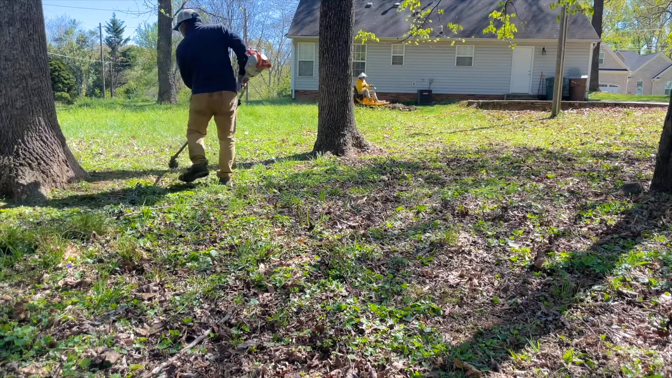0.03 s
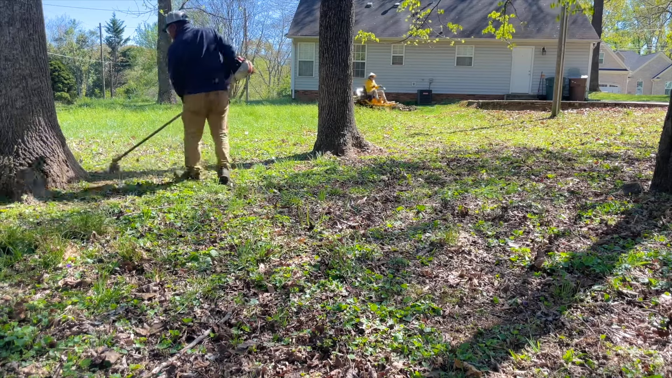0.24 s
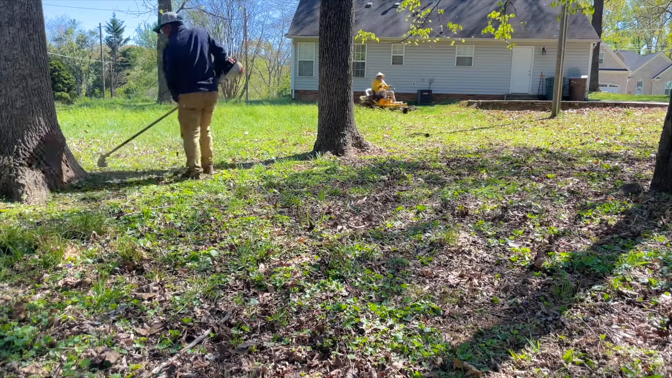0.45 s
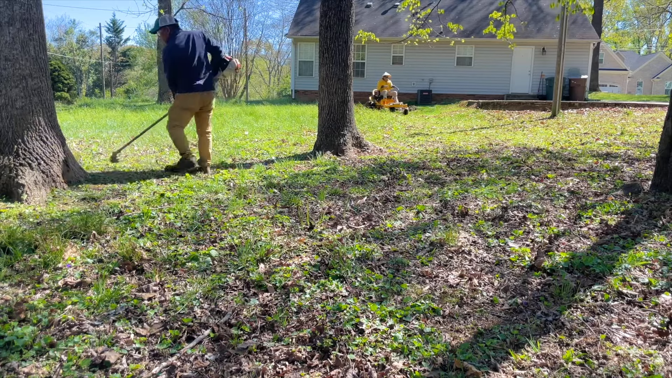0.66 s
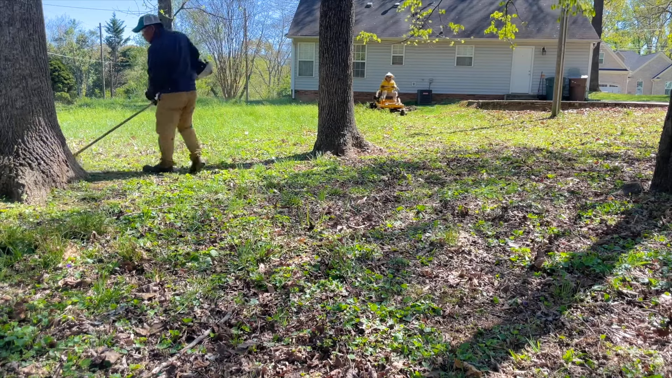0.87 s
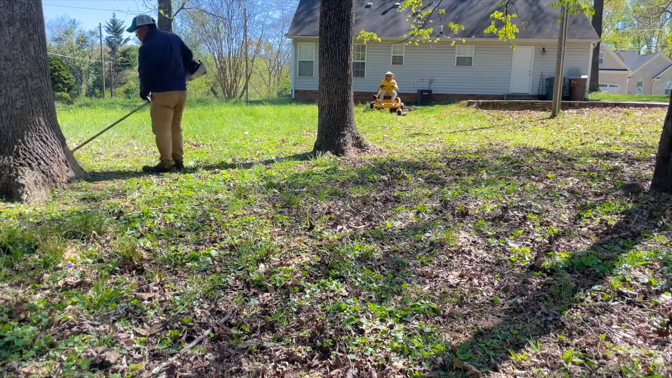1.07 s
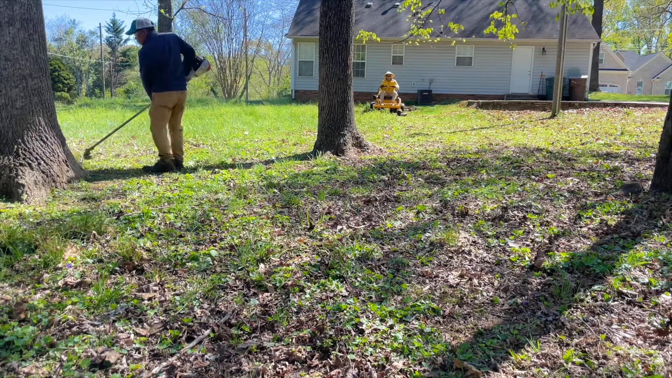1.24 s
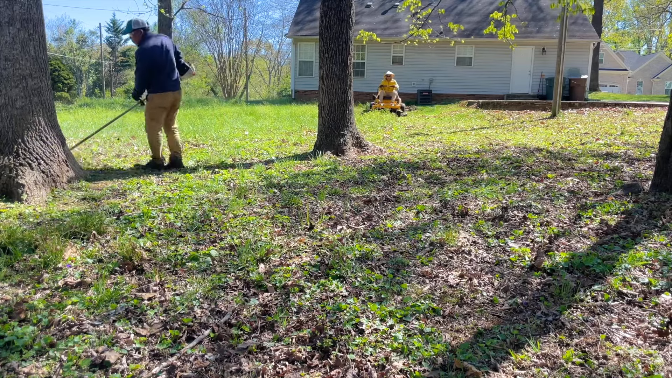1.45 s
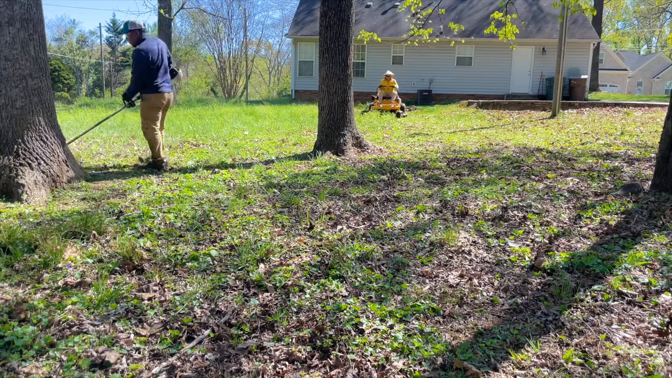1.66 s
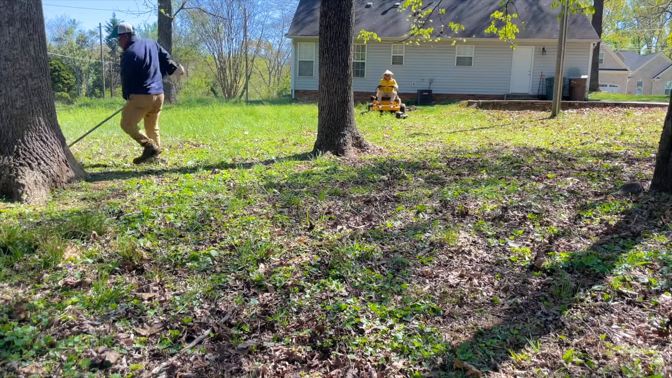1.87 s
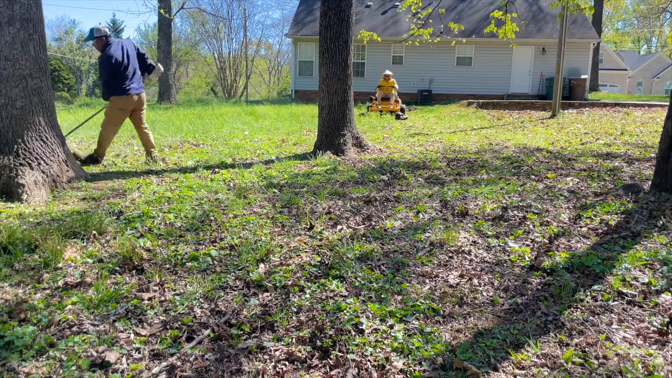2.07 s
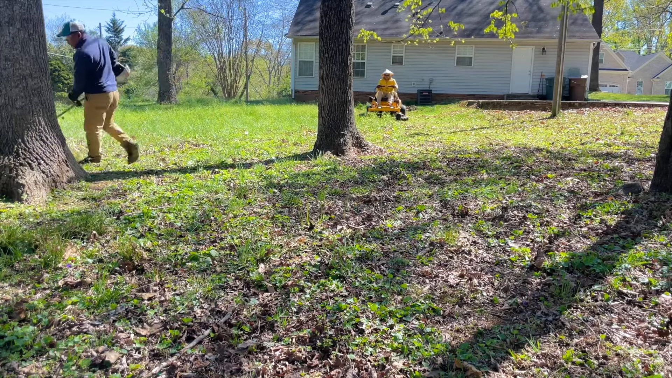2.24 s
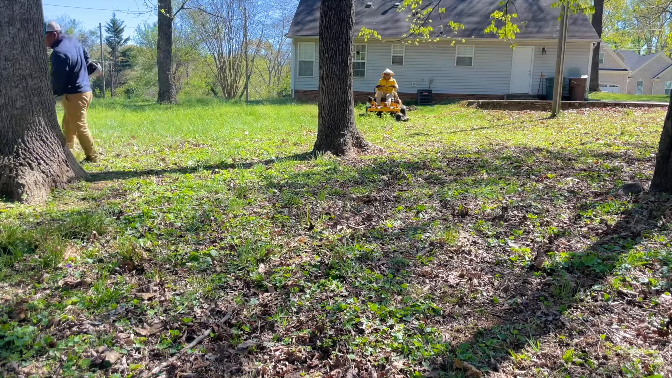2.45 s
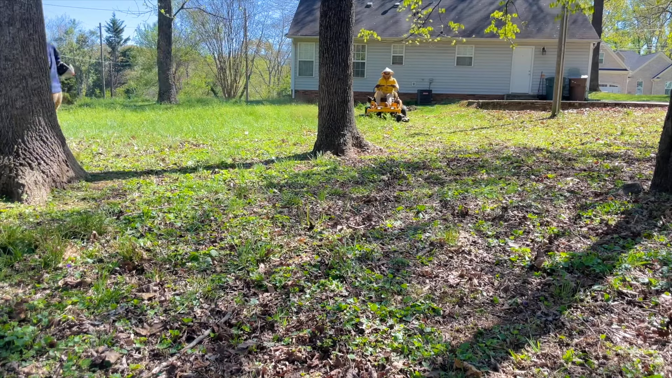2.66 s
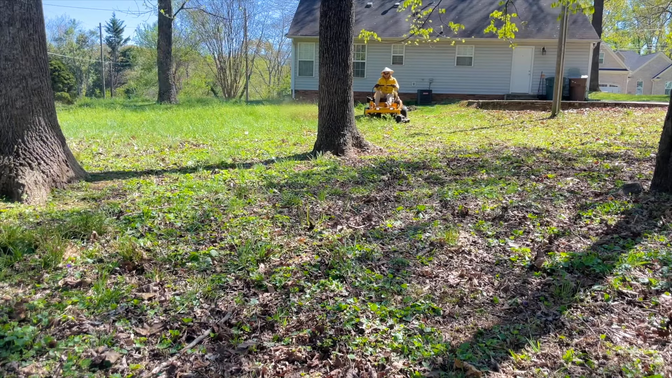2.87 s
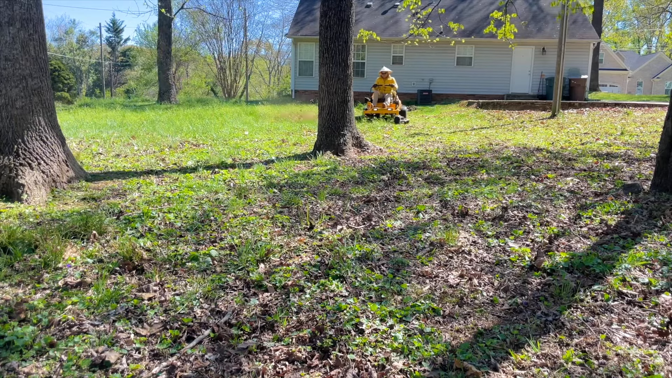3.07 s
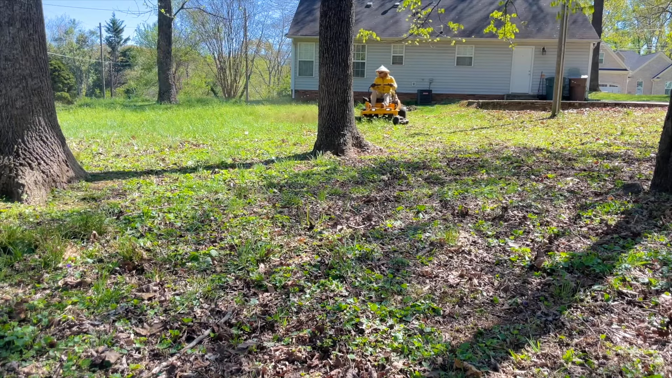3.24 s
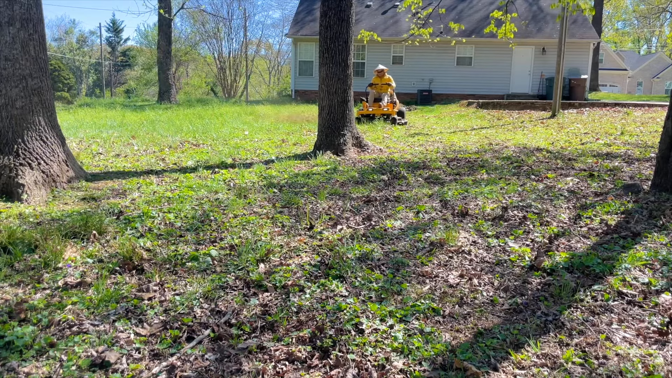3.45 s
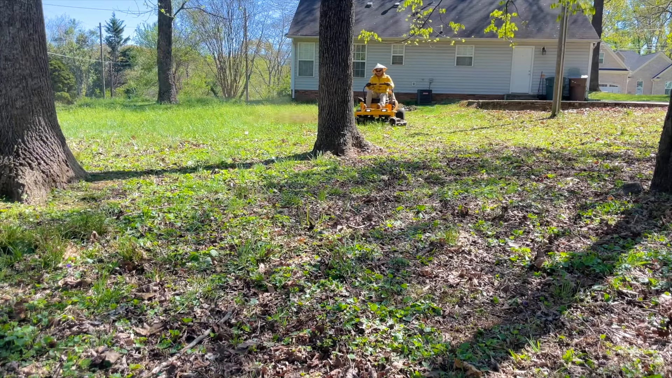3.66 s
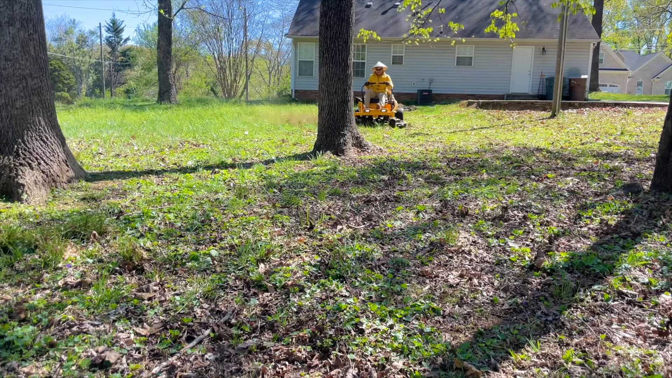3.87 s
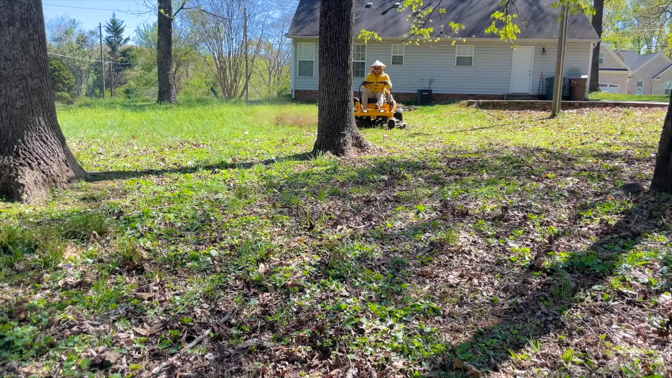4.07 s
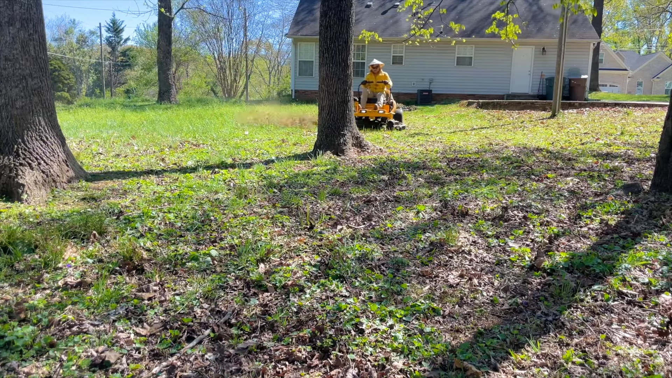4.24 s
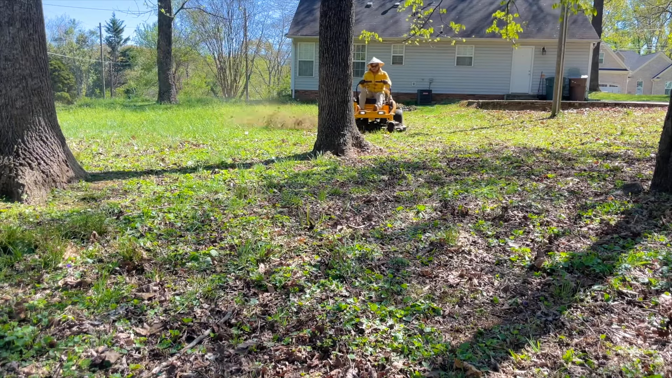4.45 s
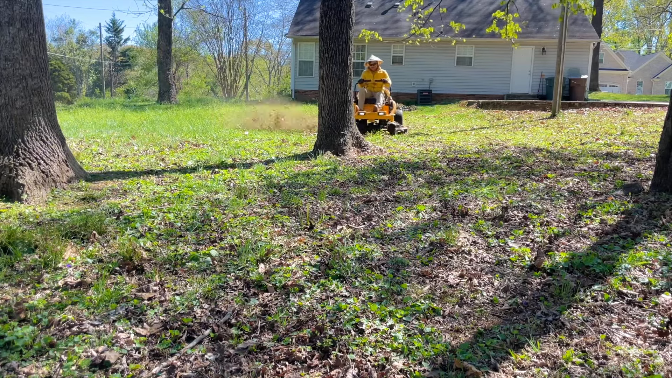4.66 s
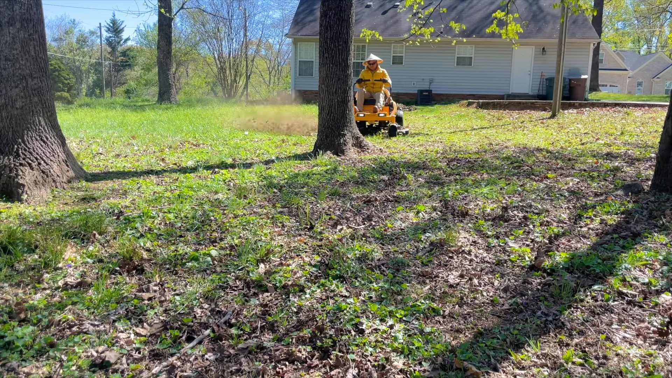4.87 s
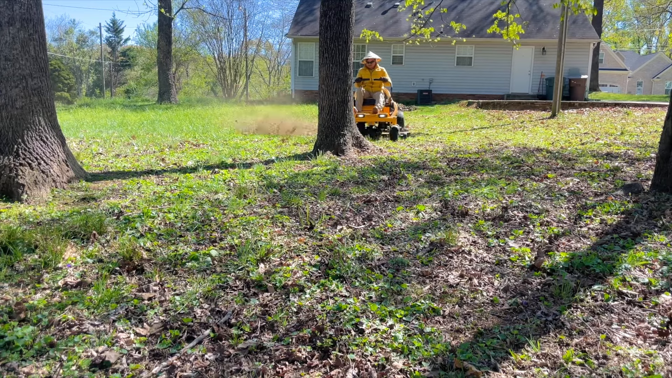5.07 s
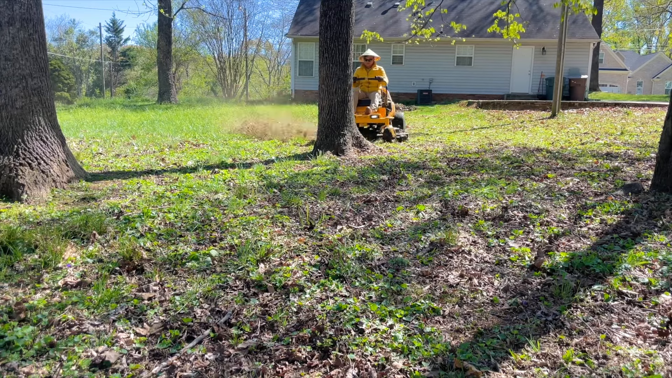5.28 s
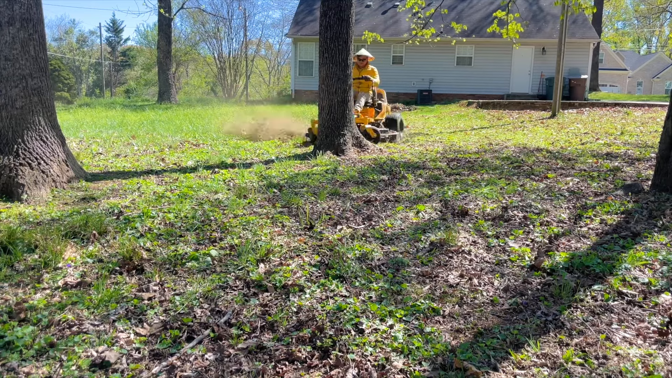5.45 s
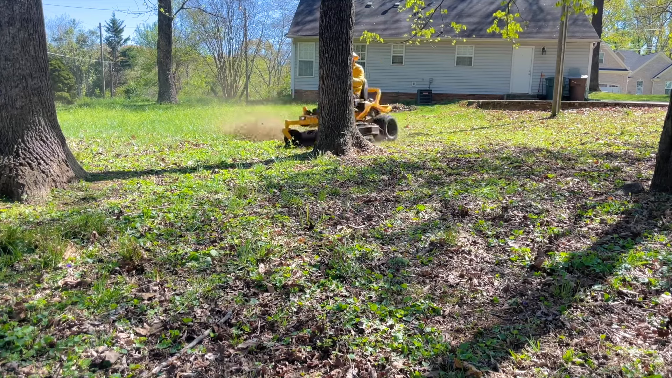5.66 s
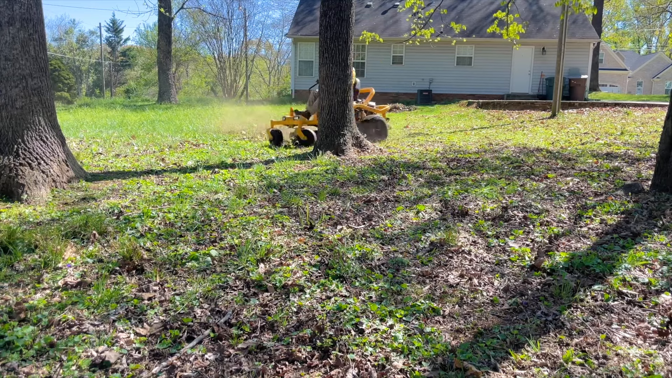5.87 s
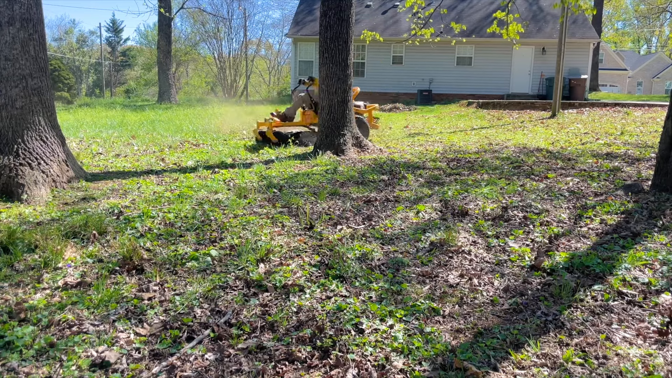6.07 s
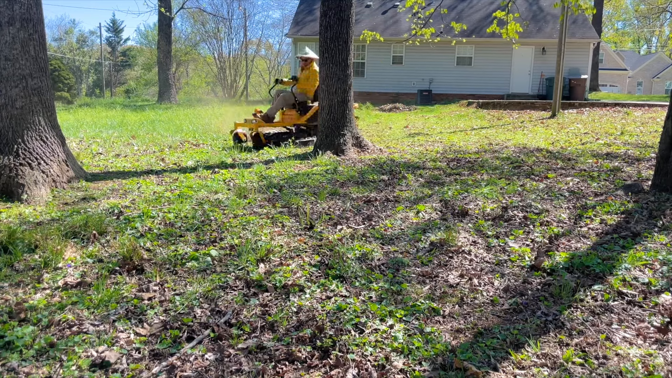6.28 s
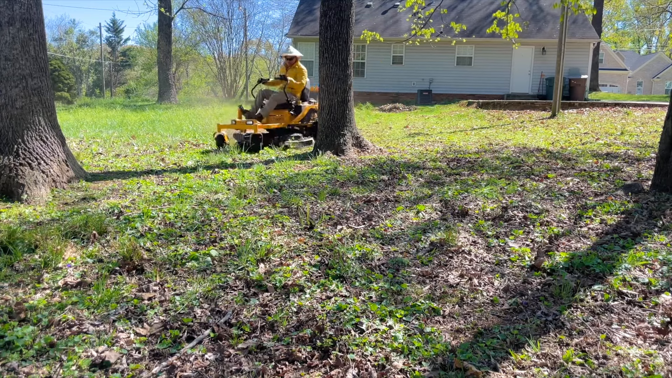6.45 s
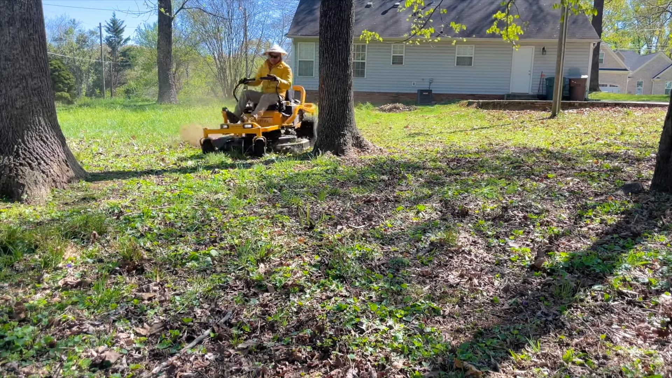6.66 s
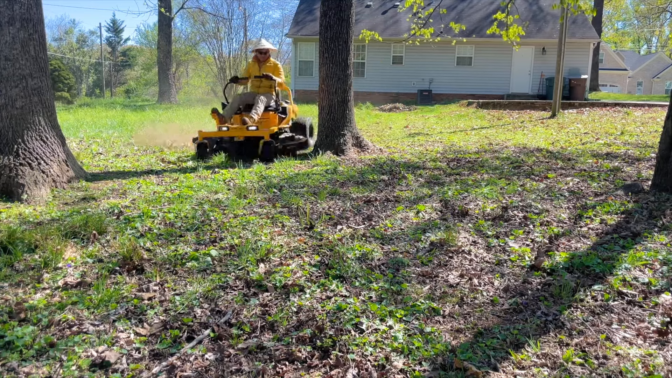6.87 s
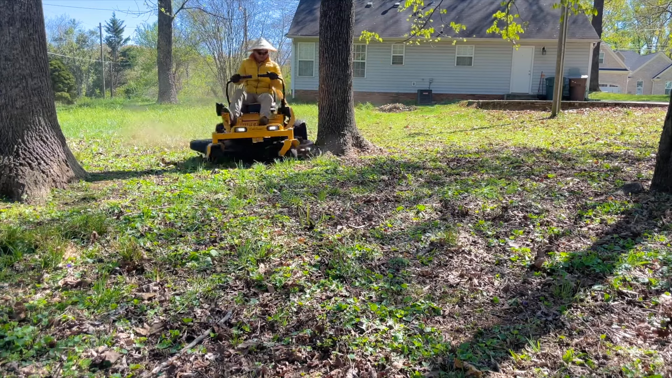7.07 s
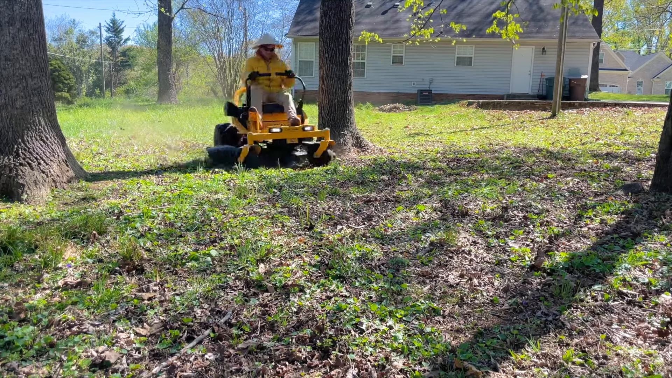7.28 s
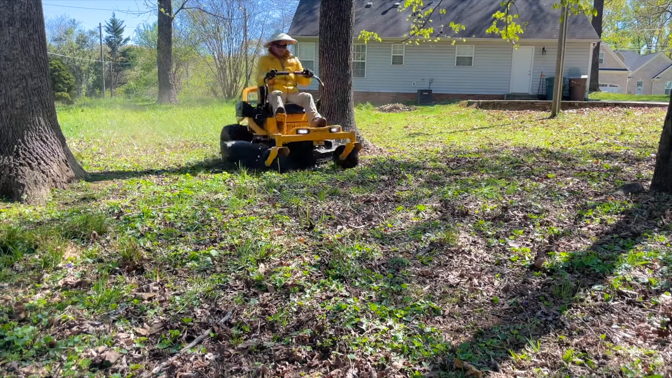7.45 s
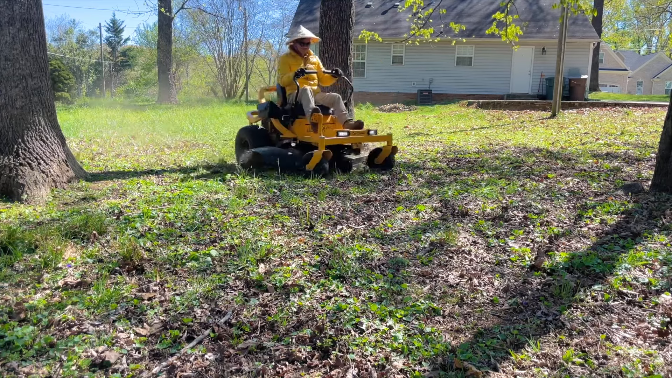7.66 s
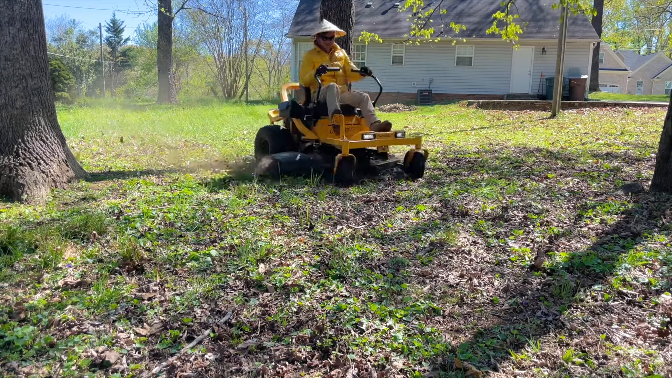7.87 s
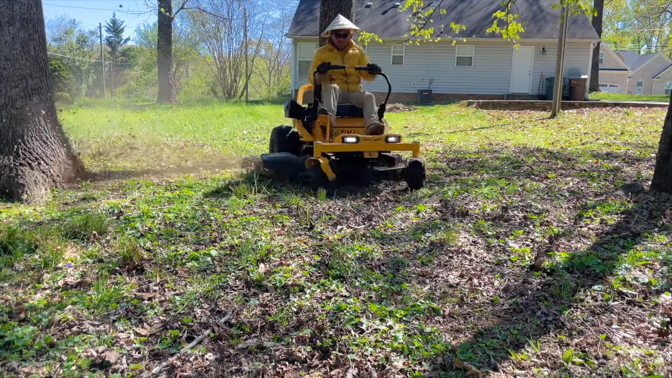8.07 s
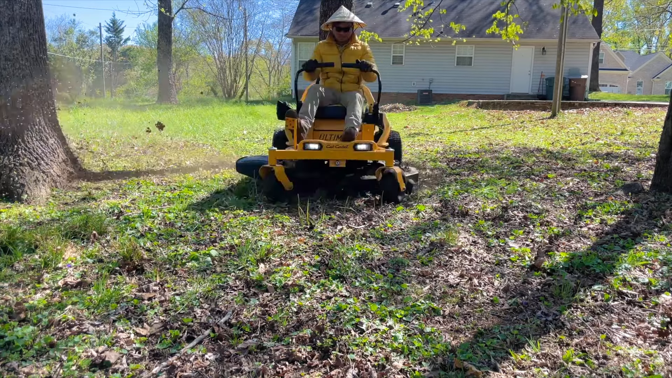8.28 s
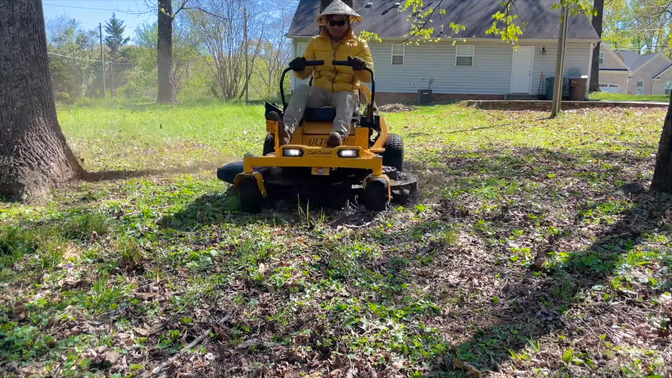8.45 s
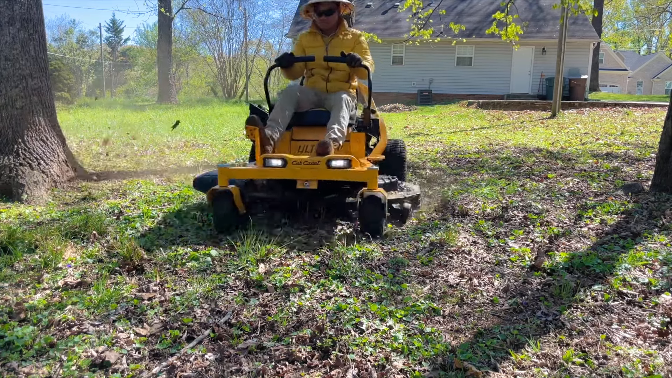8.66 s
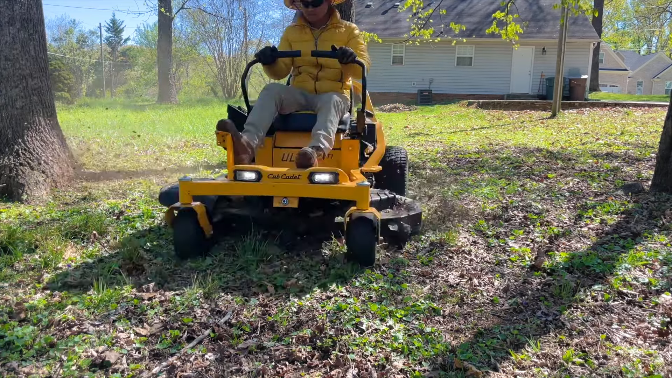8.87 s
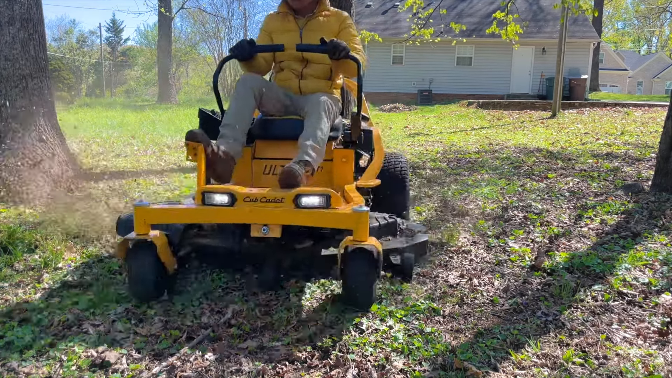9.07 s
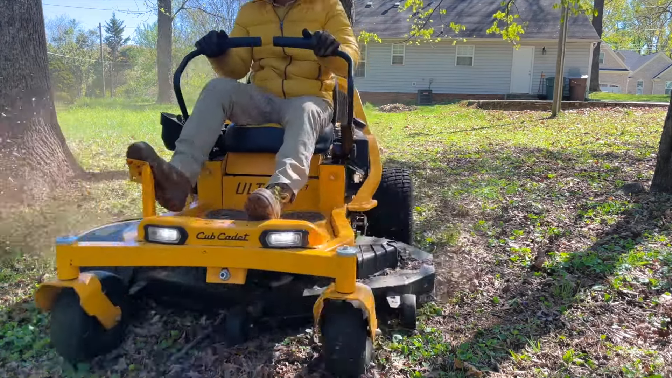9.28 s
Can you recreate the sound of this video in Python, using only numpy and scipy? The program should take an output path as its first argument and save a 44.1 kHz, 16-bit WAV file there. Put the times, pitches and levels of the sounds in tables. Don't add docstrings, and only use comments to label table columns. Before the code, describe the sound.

A riding mower drones steadily nearer across a leafy lawn, crunching twigs and leaves, while a string trimmer buzzes early on and fades behind a tree.

```python
import sys
import numpy as np
from scipy import signal
from scipy.fft import rfft, irfft, next_fast_len
from scipy.io import wavfile
from scipy.ndimage import uniform_filter1d, map_coordinates

SR = 44100
rng = np.random.default_rng(int(sys.argv[2]) if len(sys.argv) > 2 else 0)


def master_out(mix):
    frames = np.transpose(np.atleast_2d(mix))
    ceiling = np.clip(frames, -1, 1)
    pcm = np.round(ceiling * 32767).astype(np.int16)
    wavfile.write(sys.argv[1], SR, pcm)


def elevation(decibels):
    levels = np.asarray(decibels, float)
    return 10 ** (levels / 20)


N = 411012
CLOCK = np.arange(N) / SR
PASS_HZ = 124.4
TURN_S, TURN_TAKES_S = 6.8, 0.05


def unit(x):
    return x / np.sqrt(np.mean(np.abs(x) ** 2) + 1e-20)


def along(points, hz):
    f, v = np.transpose(points)
    return np.interp(np.log(hz + 1), np.log(f + 1), v)


def curves(rows):
    s, *cols = np.transpose(rows)
    return [np.interp(CLOCK, s, c) for c in cols]


def holds(rows, rise, fall):
    total = np.zeros(N)
    for s, length, height in rows:
        opening = 1 + np.exp(np.clip((s - CLOCK) / rise, -50, 50))
        closing = 1 + np.exp(np.clip((CLOCK - s - length) / fall, -50, 50))
        total += height / opening / closing
    return total


def wobble(rate):
    return map_coordinates(rng.standard_normal(N // 20), [CLOCK * rate + 2])


def filtered(x, response):
    m = next_fast_len(N + 8192)
    return irfft(rfft(x, m) * response(np.fft.rfftfreq(m, 1 / SR)), m)[..., :N]


def rush(spectrum, patchy_db, grain_db):
    grains = elevation(grain_db * wobble(1500)) * rng.standard_normal(N)
    z = signal.stft(grains, nperseg=512)[2]
    field = uniform_filter1d(rng.standard_normal(z.shape), size=8, axis=0)
    field = uniform_filter1d(field, size=10, axis=1)
    patched = signal.istft(z * elevation(patchy_db * unit(field)), nperseg=512)[1][:N]
    return unit(filtered(patched, lambda hz: elevation(along(spectrum, hz))))


def hum(hz, orders, rough, rate):
    turns = 2 * np.pi * np.cumsum(hz) / SR
    total = np.zeros(N)
    for k, db in orders:
        share = np.clip(rough * np.sqrt(k), 0, 1)
        blur = (wobble(rate) + 1j * wobble(rate)) / np.sqrt(2)
        carrier = np.exp(1j * (k * turns + 2 * np.pi * rng.random()))
        total += elevation(db) * np.real((np.sqrt(1 - share) + np.sqrt(share) * blur) * carrier)
    return np.sqrt(2) * total


def deck_facing():
    return holds([(TURN_S, 9, 1)], TURN_TAKES_S, 1)


# (time [s], crank [Hz], middle blade pass [Hz], fast blade [Hz], slow blade [Hz])
SPEEDS = [(0, 51.4, 126.5, 129.2, 119.6), (3.6, 51.8, 127.5, 130, 119), (5, 52.5, 126, 132, 119.3),
          (6.4, 51.9, 123, 136.5, 120.2), (7.1, 52.5, 122.6, 138.4, 120.3), (9.32, 52.8, 124.9, 137, 120.3)]
# (time [s], nearness [dB], leaf load [dB], blade thrum [dB], crank [dB])
MOWER = [(0, -29.5, -41.5, -28.5, -29), (.3, -27, -40.5, -30, -33), (.8, -32.5, -43.5, -29.5, -35.5),
         (1.15, -31, -45, -29, -45), (1.6, -30.5, -40.5, -30.5, -32), (2.6, -28.5, -40.5, -29.5, -34.5),
         (3, -28, -37, -25.5, -26.5), (3.75, -26, -36, -25.5, -37), (4.3, -25, -36.5, -24.5, -32.5),
         (5.4, -24.5, -32, -24, -31), (6.1, -24.5, -32, -23, -31), (6.72, -23, -28, -24.5, -30.5),
         (6.95, -21, -35, -17.5, -39.5), (7.5, -20, -30, -22.5, -29.5), (7.85, -20, -28, -25.5, -27.5),
         (8.4, -18, -29, -19, -31), (9.14, -17, -28, -19.5, -33.5), (9.32, -16.5, -31, -22.5, -29.5)]
# (time [s], length [s], lift [dB])
MUFFLER = [
    (1.85, 0.18, 5.5),
    (4.55, 0.23, 3.5),
    (5.75, 0.78, 4),
    (6.95, .35, 3.5),
    (8.1, 0.24, 3.5),
]


def engine():
    crank_hz = curves(SPEEDS)[0]
    near_db, _, _, crank_db = curves(MOWER)
    crank = hum(crank_hz, [(1, 1)], rough=0.079, rate=5)
    crank += hum(crank_hz, [(2, -11), (3, -8)], rough=0.6, rate=14)
    exhaust_db = near_db - 9.5 + holds(MUFFLER, 0.04, 0.035)
    exhaust = hum(4 * crank_hz + 2.2 * wobble(2.5), [(1, 0), (2, -12)], rough=0.25, rate=12)
    return elevation(crank_db) * crank + elevation(exhaust_db) * exhaust


# (level before the turn [dB], level after [dB])
SPINDLES = [(-5.5, 0.5), (-3, -6.5), (-5.5, -7)]
# (time [s], level [dB])
SECOND = [
    (6.9, -46.5),
    (7.35, -27),
    (7.6, -26.5),
    (8, -27.5),
    (8.4, -44),
    (9.1, -51.5),
]


def blades():
    faced = deck_facing()
    thrum = np.zeros(N)
    for hz, (before_db, after_db) in zip(curves(SPEEDS)[1:], SPINDLES):
        level_db = before_db + (after_db - before_db) * faced + 1.1 * wobble(2.5)
        wander_hz = (1 - 0.7 * faced) * 2.2 * wobble(4)
        thrum += elevation(level_db) * hum(hz + wander_hz, [(1, 0)], rough=0.1, rate=14)
    second = hum(np.full(N, 2 * PASS_HZ + 2), [(1, 0)], rough=0.5, rate=14)
    return elevation(curves(MOWER)[2]) * thrum + elevation(curves(SECOND)[0]) * second


# (frequency [Hz], level [dB])
ROAR = [(25, -19), (60, -4), (100, -1), (170, 4), (350, -1), (520, -3.5), (800, -26), (1500, -30.5)]
# (multiple, level under the roar [dB])
OVERTONES = [(2, -17), (2.7, -11.5), (3, -9), (4, -16), (5, -21), (6, -19.5), (8, -24.5)]
# (frequency [Hz], level [dB])
RASP = [(300, -50), (600, 4.5), (800, 0), (1100, 0.5), (1600, -5), (2400, -14), (4000, -24.5)]
# (frequency [Hz], level [dB])
CHOP = [(800, -6.5), (1500, 0), (1900, 2), (3200, 0), (5000, -7.5), (5700, -12), (7500, -39), (16000, -65)]


def deck():
    near_db, chop_db = curves(MOWER)[:2]
    surge = wobble(14)
    roar = rush(ROAR, patchy_db=1.5, grain_db=0.5)
    roar += hum(PASS_HZ + 1.3 * wobble(2.5), OVERTONES, rough=0.44, rate=22)

    far_db, closest_rasp_db, closest_db = -41.5, -24.5, -18
    near_rasp_db = closest_rasp_db + 2.16 * (near_db - closest_db) + 1.5 * deck_facing()
    rasp_gain = np.hypot(elevation(far_db), elevation(near_rasp_db))
    rasp = rasp_gain * elevation(0.43 * surge) * rush(RASP, patchy_db=1, grain_db=1.8)

    chop_gain = elevation(chop_db + 1.03 * surge + 0.88 * wobble(35))
    chop = chop_gain * rush(CHOP, patchy_db=0.5, grain_db=1.5)
    return elevation(near_db - 2.0) * roar + rasp + chop


# (time [s], length [s], starting shaft rate [Hz], climb [Hz], level [dB])
THROTTLE = [
    (0, .2, 85.6, 0, -46.5),
    (.25, .2, 83, -.5, -50),
    (.47, .36, 82.5, 4.6, -44),
    (.86, .11, 86.8, -1.5, -48),
    (1.01, .4, 84, 3.2, -44),
    (1.56, .68, 77, 3, -53),
    (2.3, .5, 77.5, 1, -58),
]
# (multiple of shaft rate, level [dB])
TRIMMER_ORDERS = [(1, 3), (4, -1), (5, -5), (6.5, 5), (7, 5), (8, 3), (9, -4), (10, -4), (11.5, -6),
                  (12, -4), (17.5, -13)]
# (time [s], level [dB])
WHIP = [
    (0, -79),
    (.12, -45),
    (.3, -35),
    (.38, -31),
    (.48, -47),
    (1.4, -50),
    (1.55, -72),
]
# (frequency [Hz], level [dB])
WHISTLE = [(3300, -27), (4100, -10), (5000, 9), (5600, 1), (6500, -23)]


def trimmer():
    speeds = []
    for s, length, start, climb, _ in THROTTLE:
        speeds += [(s, start), (s + length / 4, start + climb / 2.5), (s + length, start + climb)]
    shaft_hz = curves(speeds)[0]
    level = holds([(s, length, elevation(db)) for s, length, _, _, db in THROTTLE], 0.03, 0.03)
    buzz = level * hum(shaft_hz, TRIMMER_ORDERS, rough=0.03, rate=9)
    whistle_gain = elevation(curves(WHIP)[0] + 1.3 * wobble(19))
    return buzz + whistle_gain * rush(WHISTLE, patchy_db=4.0, grain_db=-1.0)


# (time [s], length [s], swish level [dB], fizz over the swish [dB])
SWEEPS = [(0, 0.34, -34.5, -0.5), (0.354, 0.22, -38, -21), (0.517, 0.38, -34, -8), (0.957, 0.4, -39.5, -21),
          (1.212, 0.19, -38, -11), (1.392, .11, -39, -2), (1.663, .55, -44.5, -17),
          (2.726, 0.16, -42.5, 6.5), (2.949, 0.089, -30, 5.5), (3.103, 0.847, -35, 2.5),
          (4.07, 0.84, -38, 1.5), (4.382, 0.37, -38, 2), (6.244, .5, -47, 2), (7.354, 0.55, -50.5, 6),
          (7.784, 0.4, -42.5, 3), (8.444, .55, -42, 1.5), (9.07, 0.092, -38.5, 7.5), (9.2, .2, -47, 9)]
# (frequency [Hz], level [dB])
SWISH = [(2500, -65), (4200, -9), (5500, -7), (7000, 0.5), (8500, -1), (9600, -1), (13000, -22)]
# (frequency [Hz], level [dB])
FIZZ = [(6000, -21.5), (8500, -8.5), (10300, -1), (12800, -7), (14600, -13), (15800, -15.5)]


def grass():
    rise_s, fall_s = 0.03, 0.018
    rest_swish_db, rest_fizz_db = -46.5, -48
    swish_gain = elevation(rest_swish_db) + holds([(s, t, elevation(db)) for s, t, db, _ in SWEEPS], rise_s, fall_s)
    fizz_gain = elevation(rest_fizz_db) + holds([(s, t, elevation(db + up)) for s, t, db, up in SWEEPS], rise_s, fall_s)
    flicker_db = 0.78 * wobble(26) + 0.61 * wobble(45) + 0.68 * wobble(6.6)
    swish = swish_gain * elevation(3.5 + flicker_db) * rush(SWISH, patchy_db=-0.86, grain_db=2)
    fizz_flicker_db = 3.0 + 1.0 * flicker_db + 1.8 * wobble(24)
    fizz = fizz_gain * elevation(fizz_flicker_db) * rush(FIZZ, patchy_db=0.3, grain_db=3.5)
    return swish + fizz


# (time [s], level [dB], rise [s])
GUSTS = [
    (0, -30, 0.012),
    (.43, -33, 0.028),
    (3.9, -34, .04),
    (5.215, -20, 0.031),
    (5.58, -26, 0.031),
    (5.93, -28, 0.038),
]
# (frequency [Hz], level [dB])
BUFFET = [(15, -22), (40, 12), (75, 6), (95, 6), (160, -39)]


def wind():
    rumble = rush(BUFFET, patchy_db=3.5, grain_db=-4.0)
    total = np.zeros(N)
    for s, db, rise in GUSTS:
        u = np.clip(CLOCK - s, 0, None) / rise
        shape = u * np.exp(1 - u)
        evened = np.linalg.norm(shape) / np.linalg.norm(shape * rumble)
        total += elevation(db) * shape * rumble * evened
    return total


# (time [s], peak level [dB], brightness [dB], rise [s])
TWIGS = [(2.6844, -26.5, -8, 0.0092), (3.1228, -23, -4, 0.0063), (3.3403, -18.5, 1.5, 0.011),
         (3.5054, -23.5, -7, 0.013), (3.6257, -24, -7, 0.0065), (3.9449, -17.5, -14, 0.0039),
         (4.0404, -19.5, -12, 0.011), (4.1864, -25.5, -20, 0.019), (4.4293, -19.5, -17, 0.0059),
         (4.577, -23, -13, 0.0028), (4.6613, -18.5, -11, 0.0044), (4.81, -15.5, -18, 0.011),
         (4.9726, -18.5, -24, 0.0063), (5.2016, -18.5, -31, 0.008), (5.3427, -16, -15, 0.01),
         (5.3797, -8, -18, 0.009), (5.44, -16.5, -17, 0.012), (5.5273, -17, -15, 0.0053),
         (5.74, -12.5, -13, 0.013), (6.543, -17.5, -17, 0.0089), (6.6754, -21.5, -22, 0.0072),
         (6.764, -13, -29, 0.0027), (7.51, -19, -14, 0.0039), (7.7348, -9.5, -7, 0.0056),
         (7.9034, -8, -24, 0.0051), (8.373, -19, -12, 0.0071), (8.5445, -17, -7, 0.0066),
         (8.8614, -17.5, -1, 0.0027), (9.1174, -13.5, -17, 0.008), (9.1744, -17, -9, 0.012)]
# (frequency [Hz], level [dB])
CRUNCH = [(500, -29), (1500, -2.5), (2500, 1.5), (5000, -3.5), (7000, -12.5), (9000, -29)]


def twigs():
    leaves_from_s, leaves_per_s = 2.3, 16
    draws = rng.random((round(leaves_per_s * (TURN_S - leaves_from_s)), 3))
    times = leaves_from_s + (np.arange(len(draws)) + draws[:, 0]) / leaves_per_s
    load_db = curves(MOWER)[1][(times * SR).astype(int)]
    leaves = [(s, db + 8.5 + 7 * b, -8 - 10 * c, 0.0037)
              for s, (_, b, c), db in zip(times, draws, load_db)]

    dull, bright = np.zeros(N), np.zeros(N)
    for s, db, bright_db, rise in list(TWIGS) + leaves:
        at = slice(max(round((s - 0.01) * SR), 0), round((s + 0.2) * SR))
        u = np.clip(CLOCK[at] - s + 0.0036, 0, None) / max(rise, 0.001)
        swell = u * np.exp(1 - u)
        dull[at] += elevation(db - 10) * swell
        bright[at] += elevation(db + bright_db - 3.0) * swell
    crunch = rush(CRUNCH, patchy_db=1, grain_db=1.8)
    crunch += elevation(-9) * rush(SWISH, patchy_db=1, grain_db=2.5)
    return dull * crunch + bright * rush(FIZZ, patchy_db=1.8, grain_db=-6)


# (time [s], length [s], level [dB])
GUARD = [
    (3.33, 0.28, -45.5),
    (3.95, .8, -47.5),
    (4.78, .12, -40),
    (5.19, .06, -32.5),
    (5.5, .12, -42),
    (5.7, .3, -44),
    (6.26, .09, -32.5),
    (6.41, 0.066, -28.5),
    (6.51, .04, -41),
    (6.56, 0.19, -35),
]
# (time [s], length [s], level [dB])
SQUEAK = [
    (5.66, .13, -47),
    (5.712, .02, -39),
]


def guard():
    rattle = hum(1812 + 9 * wobble(14), [(1, 0)], rough=0.3, rate=60)
    squeak = hum(np.full(N, 5040), [(1, 0)], rough=0.2, rate=40)
    rattle_gain = holds([(s, length, elevation(db)) for s, length, db in GUARD], 0.006, 0.012)
    squeak_gain = holds([(s, length, elevation(db)) for s, length, db in SQUEAK], 0.006, 0.012)
    return rattle_gain * elevation(1.2 * wobble(25)) * rattle + squeak_gain * squeak


def scattered(x):
    z = signal.stft(x, nperseg=1024)[2]
    y = signal.istft(z * np.exp(2j * np.pi * rng.random(z.shape)), nperseg=1024)[1][:N]
    return unit(y) * np.std(x)


# (frequency [Hz], likeness [0-1])
ALIKE = [(60, .99), (300, .985), (700, .72), (1600, .9), (3500, .78), (4800, .85), (5800, .45), (7000, .7),
         (8500, .87), (10500, .72), (12000, .75), (13000, .95)]


def scene():
    direct = engine() + blades() + deck() + trimmer() + grass() + wind() + twigs() + guard()

    def spread(hz):
        angle = np.arccos(np.clip(along(ALIKE, hz), 0, 1)) / 2
        return np.array([np.cos(angle), np.sin(angle)])

    mid, side = filtered(np.array([direct, scattered(direct)]), spread)
    return np.array([mid + side, mid - side])


def joint(x, mid_db, side_db, top_hz):
    hz, frames, z = signal.stft(np.array([x[0] + x[1], x[0] - x[1]]) / 2, SR, nperseg=2048)
    width = 24
    band = np.arange(len(hz)) // width
    power = np.add.reduceat(np.abs(z) ** 2, np.arange(0, len(hz), width), axis=1)
    ratio = (power[0] / power[1])[band]
    edge_hz = top_hz + 350 * rng.integers(-1, 2, len(frames))
    buried = (power.sum((0, 1)) / power[1])[band]
    lean = (buried / np.median(buried, axis=1, keepdims=True)) ** 0.14
    keep_mid = (ratio > lean * elevation(2 * mid_db)) | (hz[:, None] < 7400)
    keep_side = (1 / ratio > elevation(2 * side_db)) | (hz[:, None] < 1500)
    z[0] *= keep_mid
    z[1] *= keep_side & (hz[:, None] < edge_hz)
    mid, side = signal.istft(z, nperseg=2048)[1][:, :N]
    return np.array([mid + side, mid - side])


def low_pass(x):
    return signal.sosfilt(signal.butter(12, 15900, fs=SR, output="sos"), x)


# (frequency [Hz], lead [radians])
LEAD = [(30, -.3), (450, -.4), (900, 1.2), (1600, .3), (3200, 1), (4300, .55), (5300, .9), (5850, -1.6),
        (6500, -.9), (7600, -2.7), (8600, -3.14), (10000, -3.7), (12000, -5.3), (12900, -6.28)]
# (frequency [Hz], level [dB])
TILT = [(200, -.2), (700, -4.5), (1050, 0), (2000, -.3), (3300, 1.7), (5100, 2), (5850, -3.5), (7000, 1.5),
        (8500, 0)]


def record(dry):
    half = np.array([[0.5], [-0.5]])

    def port(hz):
        return elevation(half * along(TILT, hz)) * np.exp(1j * half * along(LEAD, hz))

    ports = filtered(dry, port)
    mix = joint(ports, mid_db=-7.6, side_db=-9, top_hz=12400)
    return low_pass(mix)


dry = scene()
out = record(dry)
master_out(out)
```